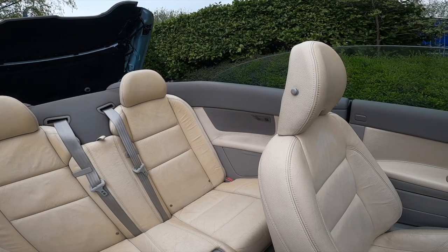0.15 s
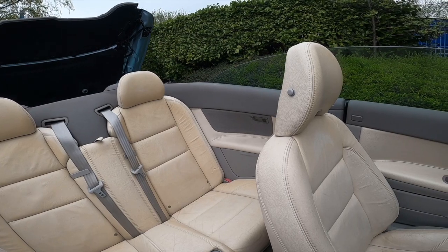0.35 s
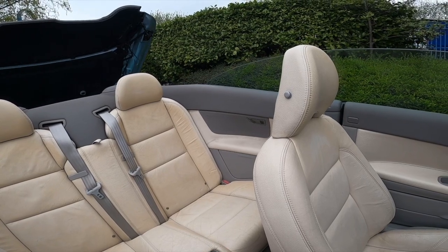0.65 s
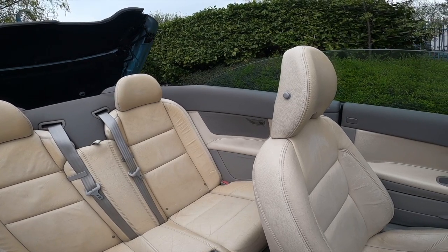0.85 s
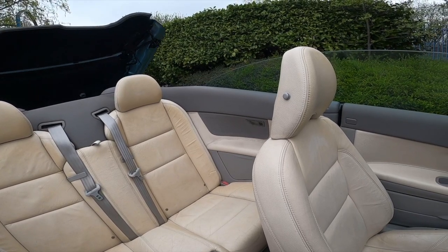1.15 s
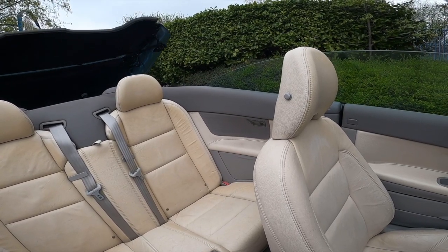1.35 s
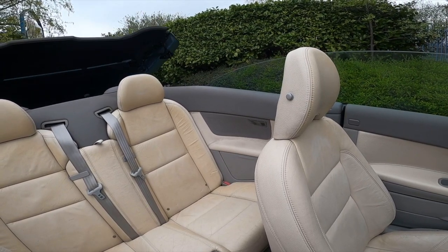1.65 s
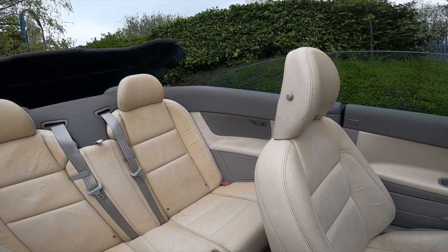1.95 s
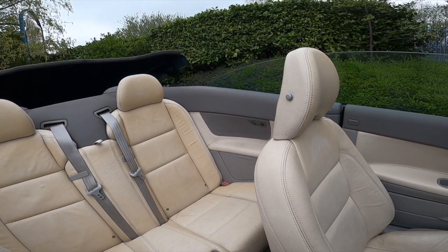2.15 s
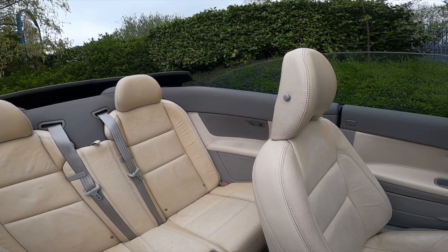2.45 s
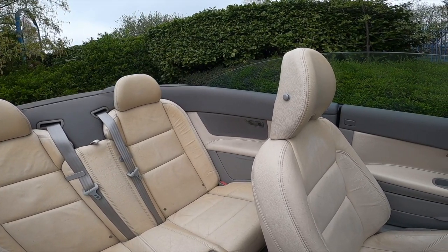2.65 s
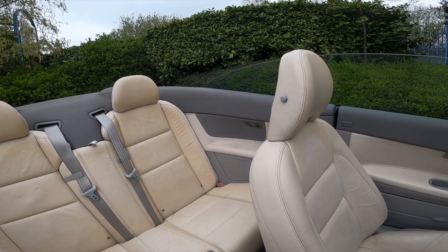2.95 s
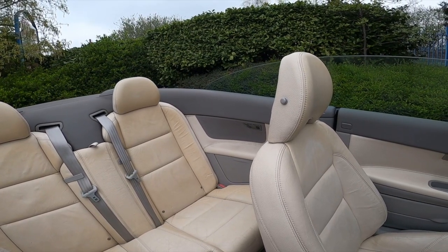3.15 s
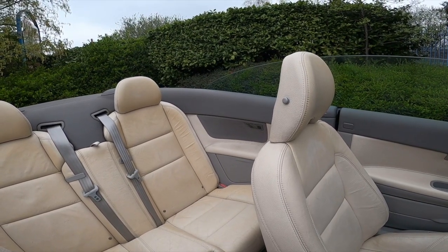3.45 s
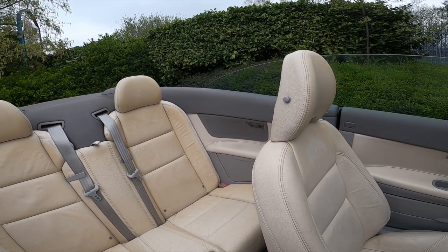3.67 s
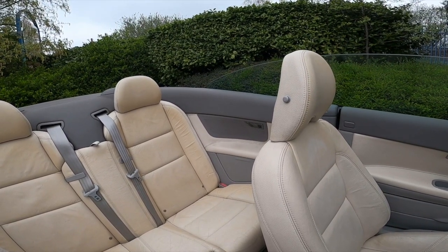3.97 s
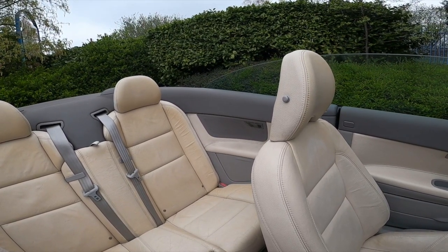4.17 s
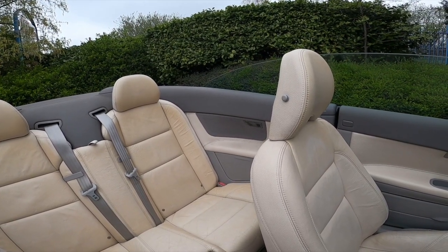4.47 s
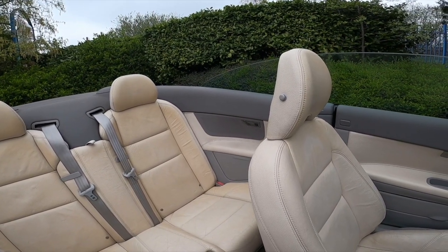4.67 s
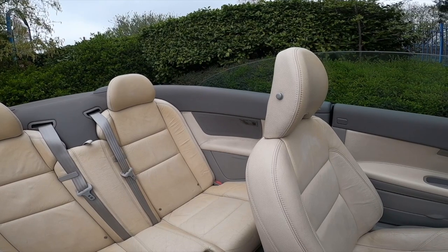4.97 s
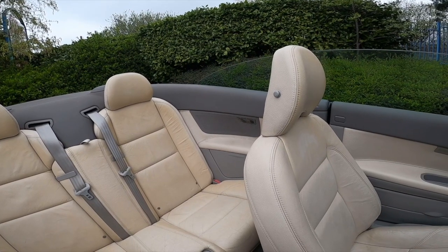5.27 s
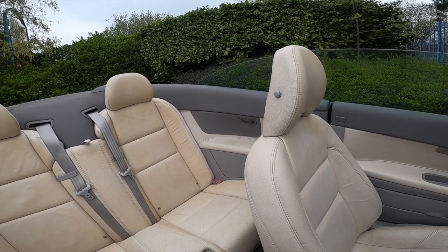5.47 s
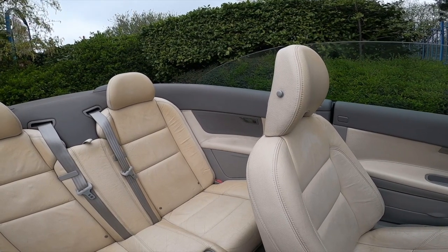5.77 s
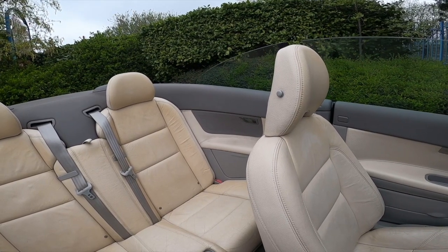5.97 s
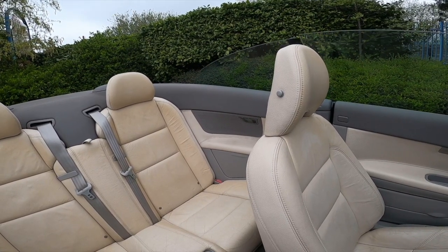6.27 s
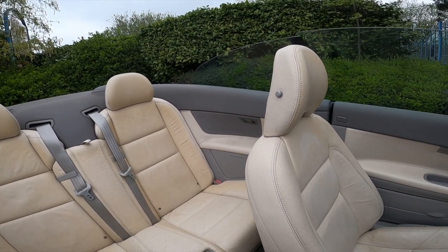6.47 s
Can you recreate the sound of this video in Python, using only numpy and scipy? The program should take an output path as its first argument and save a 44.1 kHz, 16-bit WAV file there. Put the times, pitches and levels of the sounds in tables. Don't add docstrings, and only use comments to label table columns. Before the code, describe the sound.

Close stereo pickup in an open-top car outdoors. The engine idles low while a vehicle pulls away nearby over tyre roar. A hydraulic pump whines faintly as dry hinges tick and squeak. The boot lid lands with a dull, bouncing thud, the pump runs down, and after a quieter wait the latch crunches and snaps shut. Window motors then whirr upward with a soft seal hiss and end in a small click.

```python
import sys
import numpy as np
from scipy import signal
from scipy.fft import rfft, irfft
from scipy.io import wavfile
from scipy.ndimage import uniform_filter1d, map_coordinates

SR = 44100
rng = np.random.default_rng(int(sys.argv[2]) if len(sys.argv) > 2 else 0)


def master(y):
    cut = np.clip(np.atleast_2d(y).T, -1, 1)
    pcm = np.round(cut * 32767)
    wavfile.write(sys.argv[1], SR, pcm.astype(np.int16))


def invert_db(x):
    u = np.asarray(x, float) / 20
    return 10 ** u


N = 292030


def evened(x):
    return x / np.sqrt(np.mean(x ** 2) + 1e-20)


def read(points, hz):
    f, value = np.transpose(points)
    return np.interp(np.log(hz + 1), np.log(f + 1), value)


def add(mix, s, sound, pan_db):
    part = mix[:, round(s * SR):][:, :sound.shape[-1]]
    part += sound[..., :part.shape[1]] * invert_db(np.array([[pan_db / 2], [-pan_db / 2]]))


def wander(count, hz):
    knots = rng.standard_normal(int(N / SR * 40) + 3)
    steps = np.arange(count) / SR * np.minimum(hz, 39)
    return map_coordinates(knots, [steps], order=3)


def surge(t, rows, rise_db_s, fall_db_s, rest_db):
    each = []
    for s, hold, db in rows:
        rise = rise_db_s * np.maximum(s - t, 0)
        fall = fall_db_s * np.maximum(t - s - hold, 0)
        each.append(db - rise - fall)
    return np.maximum(np.max(each, axis=0), rest_db)


def together(a_db, b_db):
    return 10 * np.log10(invert_db(a_db) ** 2 + invert_db(b_db) ** 2)


def glide(row, top, start_db, end_db):
    s, length, from_hz, to_hz, db = row
    top_hz = from_hz + top * (to_hz - from_hz)
    return [(s, from_hz, db + start_db), (s + top * length, top_hz, db), (s + length, to_hz, db + end_db)]


def tone(rows, width_hz, flutter_db, flutter_hz, start=0):
    s, hz, level_db = np.transpose(rows)
    t = np.arange(s[0], s[-1], 1 / SR)
    pitch = np.interp(t, s, hz) + width_hz / 2 * wander(len(t), 25)
    level = invert_db(np.interp(t, s, level_db) + flutter_db * wander(len(t), flutter_hz))
    fade_in = np.minimum(1, (t - t[0] + (s[0] == 0)) / 0.015)
    fade_out = np.minimum(1, (t[-1] - t) / 0.019)
    turns = np.cumsum(pitch) / SR + start
    return s[0], np.sqrt(2) * level * fade_in * fade_out * np.sin(2 * np.pi * turns)


def roughen(s, sound, rough, grain_s):
    size = round(grain_s * SR)
    swell = uniform_filter1d(uniform_filter1d(rng.standard_normal(len(sound)), size), size)
    return s, sound * (1 + rough * evened(swell)) / np.sqrt(1 + rough ** 2)


# (frequency [Hz], coherence [0 to 1])
PORT_LIKENESS = [(60, 0.98), (180, 1), (500, 0.82), (1000, 0.89), (2200, 0.91), (3000, 0.93), (4000, 0.38),
                 (5000, 0.14), (6500, 0.13), (10000, 0.19)]
# (frequency [Hz], phase [rad])
PORT_LEAD = [(0, 0), (500, -0.01), (1000, -0.53), (2200, -1.08), (3000, -1.47), (5000, -1.5), (6500, -3),
             (10000, -4)]
# (frequency [Hz], left over right [dB])
PORT_TILT = [(100, -1), (1000, 0.5), (2200, 1.5), (3000, 3), (4000, 0.5), (6500, -5), (8000, -3.5),
             (10000, 1)]


def hiss(spectrum, level_db, pan_db, patchy_db, size):
    hop, hz = size // 4, np.fft.rfftfreq(size, 1 / SR)
    a, b, c, d, patches = rng.standard_normal((N // hop + 5, len(hz), 5)).T
    patches = uniform_filter1d(uniform_filter1d(patches, size=9, axis=0), size=9, axis=1)
    same = read(PORT_LIKENESS, hz)[:, None]
    left = a + 1j * b
    right = same * left + np.sqrt(1 - same ** 2) * (c + 1j * d)
    right = right * np.exp(-1j * read(PORT_LEAD, hz))[:, None]
    tilt = invert_db(read(PORT_TILT, hz) / 2)[:, None]
    colour = invert_db(read(spectrum, hz)[:, None] + patchy_db * evened(patches))
    z = np.array([left * tilt, right / tilt]) * colour
    x = evened(signal.istft(z, nperseg=size, noverlap=size - hop)[1][:, :N])
    return x * invert_db(level_db + np.array([pan_db / 2, -pan_db / 2]))


CYCLE_HZ = 6.72
# (multiple of the engine cycle, level [dB])
IDLE_ORDERS = [(4, -56.5), (5, -39), (6, -54.5), (8, -54), (10, -53.5), (12.5, -65), (15, -61),
               (19.5, -59.5), (25, -62), (30, -69)]


def idling_engine():
    out = np.zeros((2, N))
    turns = np.cumsum(CYCLE_HZ * (1 + 0.00579 * wander(N, 1.542))) / SR
    lid_db = np.interp(np.arange(N) / SR, [.6, 3.0], [-4., 0.5])
    for k, db in IDLE_ORDERS:
        loose = .2 if k in (5, 10, 15, 19.5, 25, 30) else 1
        phase = rng.random() * (k != 5) + 0.43 + 0.055 * loose * wander(N, 4)
        level = invert_db(db + lid_db * (k == 5) + 0.85 * loose * wander(N, 6.4))
        add(out, 0, np.sqrt(2) * level * np.sin(2 * np.pi * (k * turns + phase)), -.8)
    return out


# (start [s], hold [s], drone level [dB])
NEAR_SURGES = [
    (0, 0.36, -30),
    (0.79, 0.23, -39.5),
    (1.595, 0.036, -38),
    (2.882, 0.028, -45.5),
    (6.28, 0.036, -45),
]
NEAR_COAST_DB, NEAR_RISE_DB_S, NEAR_FALL_DB_S = -52, 32, 21
PULL_HZ, SHIFT_S, SHIFT_LENGTH_S, SHIFTED_HZ, CRUISE_HZ = 42.5, 1.62, 0.62, 38.14, 38.3
# (start [s], hold [s], drone level [dB])
FAR_SURGES = [
    (1.046, 0.076, -41),
    (3.052, 0.16, -44),
    (4.791, 0.15, -46.5),
    (6.577, .04, -41.5),
]
FAR_COAST_DB, FAR_SLOPE_DB_S, FAR_HZ, FAR_SAG_HZ_S = -60, 25.5, 53.24, .85


def passing_vehicles():
    out = np.zeros((2, N))
    t = np.linspace(0, N / SR, 400)
    shift_times = [0, SHIFT_LENGTH_S, 2.9 * SHIFT_LENGTH_S]
    near_hz = np.interp(t - SHIFT_S, shift_times, [PULL_HZ, SHIFTED_HZ, CRUISE_HZ])
    near_db = surge(t, NEAR_SURGES, NEAR_RISE_DB_S, NEAR_FALL_DB_S, NEAR_COAST_DB)
    far_hz = FAR_HZ - FAR_SAG_HZ_S * t
    far_db = surge(t, FAR_SURGES, FAR_SLOPE_DB_S, FAR_SLOPE_DB_S, FAR_COAST_DB)
    add(out, *tone(np.transpose([t, near_hz, near_db]), 0.21, 1., 3.5, start=0.68), -.8)
    add(out, *tone(np.transpose([t, far_hz, far_db]), 0.62, 1.0, 15), -.8)
    return out


# (frequency [Hz], density [dB per Hz])
TYRE_ROAR = [(120, -30.5), (200, -5), (300, -7), (450, -12), (600, -13), (850, -11), (1050, -9),
             (1600, -15.5), (2200, -21), (3000, -29.5), (4000, -36), (5500, -39), (8000, -49.5),
             (11000, -69.5)]
# (frequency [Hz], density [dB per Hz])
SEAL_RUB = [(900, -17), (1800, -2), (3000, 0), (4000, -1.5), (5500, -14), (7500, -15.5), (8500, -29.5),
            (10000, -43), (12000, -32), (14000, -50)]
# (frequency [Hz], density [dB per Hz])
TOWN_RUMBLE = [(9, -27), (18, -2.5), (30, -2), (46, -3), (62, -13), (86, -6), (140, -10), (194, -15.5),
               (372, -25), (600, -30.5), (900, -84.5)]
# (time [s], level [dB])
BUSTLE = [(0, 0.5), (.55, -0.5), (1.03, 1.5), (1.6, -1), (2.25, -2.5), (2.9, -4.5), (3.6, -6), (4.15, -7.5),
          (4.72, -10.5), (5.2, -10), (6.62, -9.5)]
# (start [s], hold [s], extra rumble [dB])
JOLTS = [
    (1.404, 0.15, 3),
    (2.503, 0.54, 2),
    (3.21, 0.31, 1.5),
    (5.558, 0.054, 2),
    (6.296, 0.11, 2.5),
]
JOLT_SLOPE_DB_S = 15
ROAR_DB, RUB_DB, RUMBLE_DB = -53, -73, -47
RUB_SHARE = 1.5
WINDOW_ROAR_DB, WINDOW_RUB_DB = -62.5, -69.5


def air():
    t = np.arange(N) / SR
    bustle_db = np.interp(t, *np.transpose(BUSTLE))
    roar_db = together(ROAR_DB + bustle_db, WINDOW_ROAR_DB + window_effort_db(t))
    rub_db = together(RUB_DB + RUB_SHARE * bustle_db, WINDOW_RUB_DB + window_effort_db(t))
    rumble_db = RUMBLE_DB + surge(t, JOLTS, JOLT_SLOPE_DB_S, JOLT_SLOPE_DB_S, 0)
    road_side_db = np.interp(t, [2.4, 3.2], [-.8, .9])
    roar = hiss(TYRE_ROAR, roar_db, road_side_db, 1.2, size=1024)
    rub = hiss(SEAL_RUB, rub_db + 0.27 * wander(N, 6.8), road_side_db, 0.44, size=256)
    return roar + rub + hiss(TOWN_RUMBLE, rumble_db, 0 * t, 1.2, size=4096)


# (time [s], pitch [Hz], level [dB])
PUMP = [(1.0, 428, -69), (1.2, 423, -58.5), (1.4, 418.3, -57), (1.65, 411.6, -55.5), (2.0, 410, -58.5),
        (2.4, 407, -60), (2.68, 403, -64.5), (2.97, 394, -64.5), (3.15, 376, -73.5), (3.4, 352.7, -65.5),
        (3.58, 342, -66)]
# (time [s], pitch [Hz], level [dB])
STROKES = [
    [(0, 444, -59.5), (.12, 447, -62), (.3, 440.7, -60.5), (.5, 434.4, -63), (.75, 433, -65),
     (.98, 429, -66)],
    [(0, 409, -63.5), (.3, 410, -59.5), (.6, 406.5, -64.5), (.76, 404.3, -57), (.84, 404, -57),
     (.93, 411, -59), (1.0, 403, -68), (1.2, 410, -59.5)],
]
# (start [s], length [s], from [Hz], to [Hz], top level [dB])
GEARS = [
    (1.7, 2.0, 183, 181, -61),
    (0, 6.62, 485, 484, -71.5),
    (1.55, .75, 487, 486, -70),
    (1.7, 1.0, 721, 711, -72.5),
    (3.5, 2.05, 557, 553, -72),
    (3.6, 1.95, 641, 631, -70),
]


def pump():
    out = np.zeros((2, N))
    whines = [(PUMP, 2.5)] + [(rows, 4.5) for rows in STROKES]
    whines += [(glide(row, top=0.46, start_db=-1.5, end_db=-1.5), 4.5) for row in GEARS]
    for rows, width_hz in whines:
        add(out, *roughen(*tone(rows, width_hz, .8, 22), 0.22, 0.006), -.6)
    return out


# (start [s], length [s], from [Hz], to [Hz], top level [dB])
SQUEAKS = [
    (0.0, .08, 2200, 2100, -78),
    (.72, .045, 1595, 1650, -59),
    (.99, .09, 1450, 1540, -64),
    (1.3, .17, 1880, 2000, -70),
    (.71, .05, 1395, 1400, -61),
    (3.9, .43, 2680, 2760, -82),
]
# (time [s], pitch [Hz], level [dB])
LONG_SQUEAK = [
    (1.445, 2030, -71),
    (1.464, 2047, -63),
    (1.472, 1985, -63),
    (1.498, 2041, -63),
    (1.532, 2035, -62.5),
    (1.543, 2070, -66),
    (1.592, 2090, -60),
    (1.64, 2145, -64),
    (1.675, 2150, -68),
]


def hinge_squeaks():
    out = np.zeros((2, N))
    for row in SQUEAKS:
        rows = glide(row, top=0.73, start_db=-5, end_db=-11.0)
        add(out, *roughen(*tone(rows, 35, 1.2, 30), .35, .003), -1.5)
    add(out, *roughen(*tone(LONG_SQUEAK, 45, 1, 35), .3, .002), -1.5)
    return out


# (time [s], peak level [dB], pitch [Hz])
TICKS = [(0.018, -54.5, 3950), (0.2594, -66, 2650), (0.5207, -67, 2500), (0.7297, -61, 3870),
         (.745, -63, 4200), (0.8294, -64, 2650), (.51, -48, 1300), (1.004, -49, 3240), (1.004, -61.5, 5000),
         (1.006, -48, 1000), (1.214, -58.5, 3080), (.27, -64, 2820), (1.034, -67, 3400), (1.088, -49, 2080),
         (1.1763, -53.5, 2900), (1.2077, -56, 2970), (1.372, -55, 2690), (1.521, -57.5, 3220),
         (2.625, -53.5, 2645), (2.712, -56.5, 3500), (2.728, -57, 4250), (3.2924, -58, 2740),
         (3.5556, -63, 2940), (5.5312, -56, 3970), (6.424, -57, 3350), (6.453, -46.5, 1540),
         (6.453, -46, 960), (1.648, -49, 1190), (6.453, -58, 3440), (6.411, -58, 1500), (6.554, -61, 2950)]
# (time [s], peak level [dB], middle frequency [Hz])
SLIPS = [(.249, -62, 4470), (.262, -63, 4000), (.512, -60, 4000), (.715, -73, 4500), (0.725, -61, 4035),
         (.74, -62, 4200), (.827, -60, 4200), (0.892, -59, 4000), (.989, -67, 4500), (0.904, -61, 4500),
         (.925, -74, 6540), (0.999, -58, 3300), (1.087, -60, 4000), (1.098, -59, 4500), (1.199, -75, 5960),
         (1.385, -64.5, 4300), (1.52, -62, 4400), (1.94, -67.5, 5360), (2.305, -74, 6460),
         (2.625, -71, 5800), (2.712, -50.5, 5200), (2.71, -68.5, 7850), (2.714, -65, 5000),
         (2.726, -69, 6000), (2.731, -68, 5000), (2.802, -69, 5440), (2.828, -67, 7450), (2.828, -63, 5200),
         (3.133, -70, 5000), (3.98, -77, 6500), (4.36, -77, 6500), (4.66, -74.5, 5300), (5.542, -71, 5000),
         (5.552, -55, 2600), (5.58, -56, 3000), (1.79, -71, 4500), (1.995, -73, 5500), (5.592, -49, 3700),
         (5.6, -49, 3700), (5.608, -58, 3500), (6.453, -58, 3500)]
TICK_T60_S, SLIP_T60_S = .04, .025
LID_DOWN_S, HINGE_PAN_DB, SEAL_PAN_DB, SLIP_PAN_DB = 2.6, -11, 0, -6.5


def ticks():
    out, t = np.zeros((2, N)), np.arange(4096) / SR
    bins = np.fft.rfftfreq(4096, 1 / SR) + 1
    rows = []
    for row in TICKS:
        pan_db = HINGE_PAN_DB if row[0] < LID_DOWN_S else SEAL_PAN_DB
        rows.append((*row, pan_db, TICK_T60_S, 1.))
    rows += [(*row, SLIP_PAN_DB, SLIP_T60_S, 0) for row in SLIPS]
    for s, db, hz, pan_db, t60, ringing in rows:
        noise = rng.standard_normal((2, 4096))
        slopes = invert_db(-(14.5 + 10 * ringing) * abs(np.log2(bins / hz)))
        resonance = ringing / (1 + ((bins - hz) / 220) ** 2)
        colour = (slopes + resonance) / (1 + (bins / (1.8 * hz)) ** 8)
        burst = irfft(rfft(noise + 0.76 * noise[::-1]) * colour)
        burst += 1.3 * ringing * burst.std() * np.sin(2 * np.pi * hz * t)
        burst *= invert_db(-60 * t / t60) * np.minimum(1, t / 0.00084)
        add(out, s, invert_db(db - 2.0) * burst / abs(burst).max(), pan_db)
    return out


# (start [s], length [s], from [Hz], to [Hz], top level [dB])
CHIRPS = [
    (4.69, .08, 5500, 5900, -96),
    (4.8, .08, 6050, 6300, -97),
    (4.81, .08, 5700, 5850, -95),
    (4.68, .05, 4500, 4600, -96),
    (5.06, .09, 5700, 6200, -95),
    (5.14, .06, 6250, 5700, -95),
    (5.25, .08, 7050, 7300, -97),
    (.73, .04, 8600, 8700, -93),
]


def birds():
    out = np.zeros((2, N))
    for row in CHIRPS:
        add(out, *roughen(*tone(glide(row, .5, -3, -3), 90, 2, 30), .5, .005), 0)
    return out


# (start [s], length [s], from [Hz], to [Hz], top level [dB])
SHUDDERS = [
    (2.7, .3, 103, 100, -51),
    (2.78, .1, 42, 36, -37),
    (2.8, .3, 148, 138, -49),
    (5.53, .07, 135, 135, -46),
    (5.58, .09, 85, 70, -41),
    (5.59, .16, 45, 43, -39),
    (5.63, .1, 140, 150, -48),
    (3.12, .08, 150, 190, -48),
]


def shudders():
    out = np.zeros((2, N))
    for row in SHUDDERS:
        add(out, *tone(glide(row, top=0.38, start_db=-2, end_db=-7.0), 0.8, 0.45, 21.0), -.8)
    return out


def ring(modes, t, chance, spread_db, tilt_db, detune):
    x = np.zeros(len(t))
    for (hz, db, t60), c in zip(modes, chance):
        hardness_db = tilt_db * np.log2(hz / modes[0][0])
        level = invert_db(db + spread_db * c + hardness_db - 60 * t / t60)
        x += level * np.sin(2 * np.pi * hz * (1 + detune * c) * t)
    x = x * (1 - np.exp(-t / .0009))
    return x / abs(x).max()


# (time [s], panel thud [dB], hardness [dB per octave], crunch [dB])
BLOWS = [(2.711, -32, 5, -38), (2.719, -31, 10, -47), (2.725, -26, -25, -43), (2.732, -28.5, -5, -46),
         (2.738, -34, 4, -57), (2.753, -33, -1, -54), (2.771, -25.5, 0.5, -47), (2.774, -21, -1, -48),
         (2.779, -21.5, -6, -48), (2.803, -35.5, 5, -43), (2.83, -32.5, -6, -47), (2.845, -41, 6, -54),
         (3.137, -35.5, 4, -40.5), (5.536, -45, 3, -56), (5.546, -44, 7, -55), (5.557, -29, 3, -37),
         (5.562, -27.5, 2.5, -39), (5.566, -40, 12, -64), (5.571, -19, 1, -66), (5.579, -39, 2.5, -45),
         (5.593, -36, -5, -50), (5.605, -27, -8, -53), (5.61, -41, 3, -48), (5.618, -27, 4, -51),
         (5.635, -46, 3, -34), (6.408, -40, 3, -54), (6.425, -43, 2, -47), (6.453, -42, 10, -39)]
# (frequency [Hz], level [dB], decay time T60 [s])
PANEL_MODES = [(194, -9, 0.1), (230, -2.5, 0.12), (271, 7.5, 0.051), (325, 1.5, 0.064), (403, 0.5, 0.059),
               (452, -3, 0.069), (512, -4, 0.041), (620, -9, 0.098), (720, -21, 0.072), (920, -10.5, 0.069),
               (1160, -11, 0.024), (1558, -16, 0.044)]
# (frequency [Hz], density [dB per Hz])
CRUNCH = [(300, 0), (700, -0.5), (1500, -11.5), (2200, -16.5), (3200, -21.5), (4500, -27.5), (7000, -40.5),
          (10000, -53), (13000, -67.5)]


def blows():
    out, t = np.zeros((2, N)), np.arange(8192) / SR
    colour = invert_db(read(CRUNCH, np.fft.rfftfreq(len(t), 1 / SR)))
    for s, thud_db, hard_db, crunch_db in BLOWS:
        grit = rng.standard_normal((2, len(t)))
        crunch = irfft(rfft(grit + 0.46 * grit[::-1]) * colour)
        crunch *= invert_db(-60 * t / 0.064) * np.minimum(1, t / .001)
        add(out, s, invert_db(crunch_db - 5.5) * crunch / abs(crunch).max(), .6)
        chance = rng.standard_normal(len(PANEL_MODES))
        add(out, s, invert_db(thud_db - 4) * ring(PANEL_MODES, t, chance, 3.2, hard_db, 0.023), -.8)
    return out


# (start [s], hold [s], level [dB])
GRIND = [
    (2.716, 0.014, -53),
    (2.775, .012, -55.5),
    (5.551, .01, -47),
    (5.559, 0.028, -43.5),
    (5.589, 0.017, -43.5),
    (5.618, 0.012, -50),
    (5.66, 0.079, -64),
]
GRIND_RISE_DB_S, GRIND_FALL_DB_S = 1503, 298.5


def grinding():
    t = np.arange(N) / SR
    grind_db = surge(t, GRIND, GRIND_RISE_DB_S, GRIND_FALL_DB_S, -200) + 3.5
    return hiss(CRUNCH, grind_db, 1.6 + 0 * t, 0.99, size=256)


# (time [s], peak level [dB], left over right [dB])
SNAPS = [
    (5.571, -41, -6),
    (5.591, -40, 24.5),
    (5.597, -38.5, 1),
    (5.604, -50, 6),
]
# (frequency [Hz], level [dB], decay time T60 [s])
LATCH_MODES = [(1370, -7, .03), (1983, 2, 0.04), (2120, 1, 0.027), (2477, -2, 0.032), (2900, -6, 0.053),
               (3400, -15, 0.023), (3800, -19, 0.036), (3860, -15.5, 0.045), (4490, -20, 0.046),
               (5200, -28, 0.028), (5480, -23, 0.026)]


def latch_snaps():
    out, t = np.zeros((2, N)), np.arange(8192) / SR
    for s, db, pan_db in SNAPS:
        chance = rng.standard_normal(len(LATCH_MODES))
        add(out, s, invert_db(db) * ring(LATCH_MODES, t, chance, 1.9, 0, 0.014), pan_db)
    return out


# (start [s], hold [s], effort [dB])
WINDOWS = [
    (5.654, 0.99, 1),
    (6.314, 0.034, 4.5),
]
WINDOW_RISE_DB_S, WINDOW_FALL_DB_S = 104.5, 16


def window_effort_db(t):
    return surge(t, WINDOWS, WINDOW_RISE_DB_S, WINDOW_FALL_DB_S, -100)


# (frequency [Hz], density [dB per Hz])
GLASS = [(3000, -24), (5000, 4.5), (7000, -6.5), (8200, -6), (9500, -14), (12000, -21.5), (13500, -31)]
GLASS_DB = -79


def sliding_glass():
    t = np.arange(N) / SR
    return hiss(GLASS, GLASS_DB + 1.2 * window_effort_db(t), 0 * t, .8, size=256)


# (start [s], length [s], from [Hz], to [Hz], top level [dB])
WINDERS = [(5.66, .25, 420, 422, -65), (5.93, .07, 435, 435, -62), (5.66, .2, 1350, 1362, -73),
           (5.67, .13, 722, 716, -62), (5.82, .2, 770, 748, -67), (5.85, .33, 728, 650, -66),
           (6.17, .2, 650, 612, -63), (6.32, .1, 1040, 1045, -66), (6.04, .3, 1420, 1385, -69),
           (6.0, .2, 425, 410, -62), (6.15, .24, 408, 385, -59), (6.33, .14, 640, 655, -62),
           (6.39, .16, 595, 612, -62), (5.95, .45, 1260, 1190, -71), (6.42, .2, 425, 395, -66),
           (5.85, .25, 365, 360, -67)]


def window_motors():
    out = np.zeros((2, N))
    for row in WINDERS:
        rows = glide(row, top=.45, start_db=-2, end_db=-5)
        add(out, *roughen(*tone(rows, .017 * row[2], .8, 22), 0.22, 0.006), -.6)
    return out


def cabin(x):
    t = np.arange(SR // 4) / SR
    struck = rng.random((2, len(t))) < .05
    taps = rng.standard_normal((2, len(t))) * struck * invert_db(-60 * t / 0.049) * (t > .002)
    taps = signal.lfilter(*signal.butter(2, 350, "high", fs=SR), taps)
    return signal.fftconvolve(x, taps / np.linalg.norm(taps[0]), axes=1)[:, :N]


def scene():
    bright = ticks()
    heavy = blows() + latch_snaps()
    steady = idling_engine() + passing_vehicles() + air() + pump()
    moving = hinge_squeaks() + birds() + shudders() + grinding() + sliding_glass() + window_motors()
    return steady + moving + bright + heavy + invert_db(-4.5) * cabin(bright) + invert_db(-14.0) * cabin(heavy)


def band_limit(x):
    return signal.sosfilt(signal.butter(12, 12300, fs=SR, output="sos"), x)


def record(dry):
    bass_cut = signal.butter(3, 21, "high", fs=SR, output="sos")
    heard = signal.sosfiltfilt(bass_cut, dry, padtype="even", padlen=SR // 4)
    heard = heard * np.minimum(1, .05 + np.arange(N)[::-1] / (.006 * SR))
    return band_limit(heard)


dry = scene()
out = record(dry)
master(out)
```